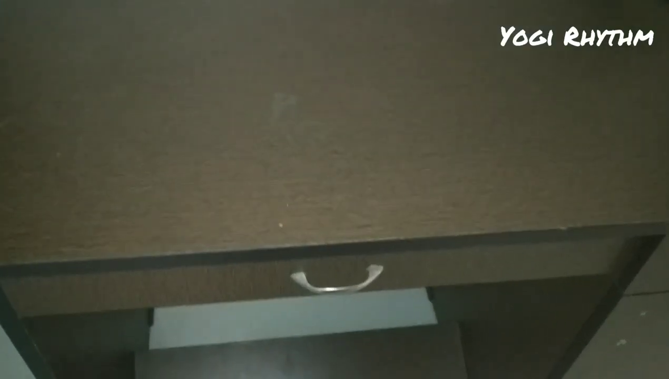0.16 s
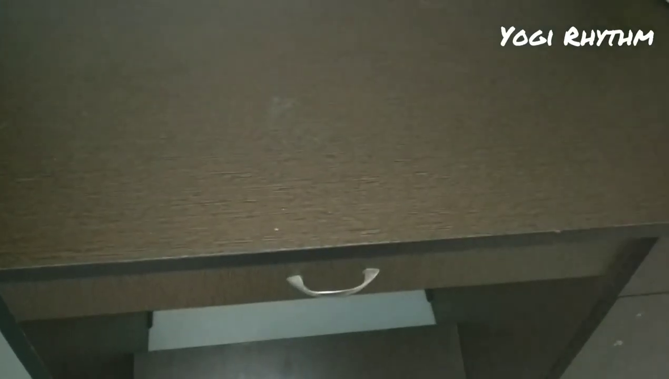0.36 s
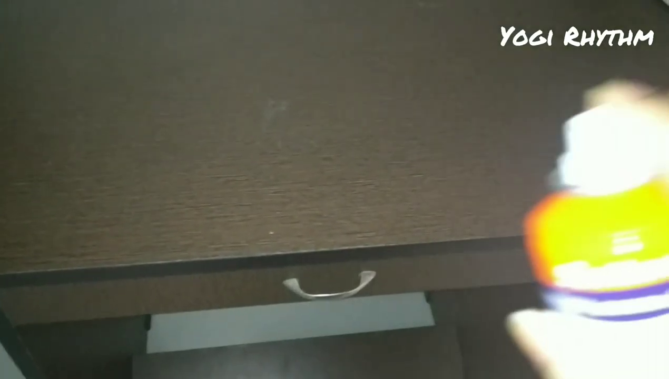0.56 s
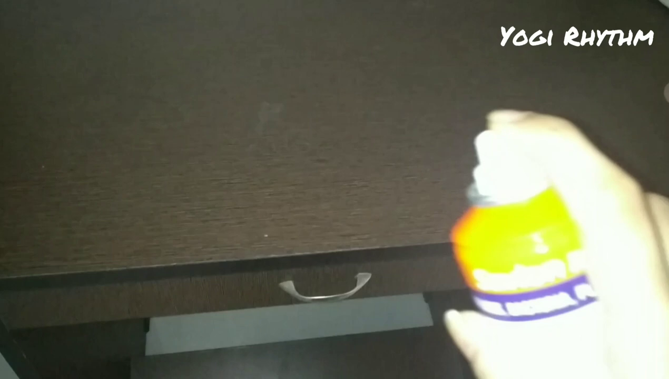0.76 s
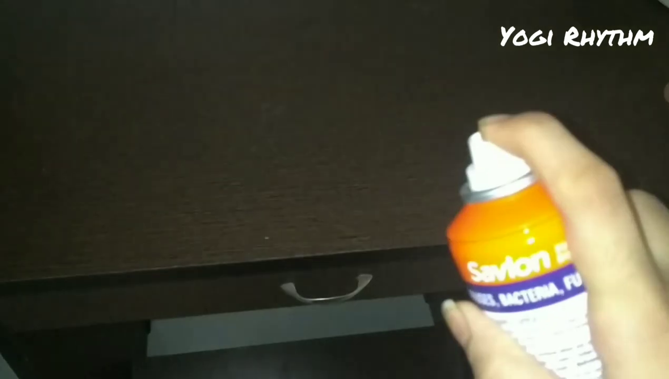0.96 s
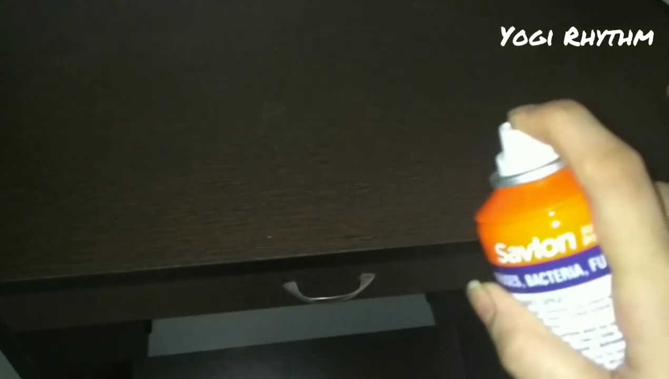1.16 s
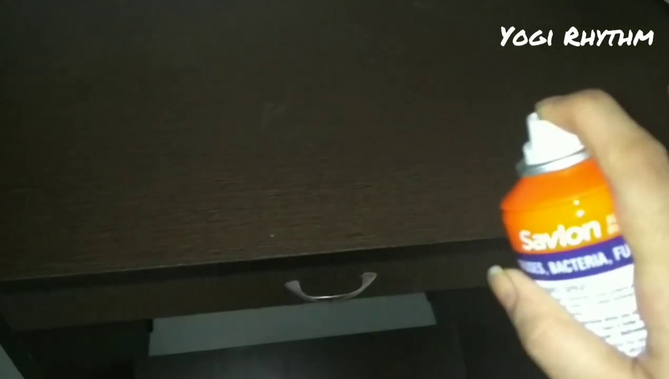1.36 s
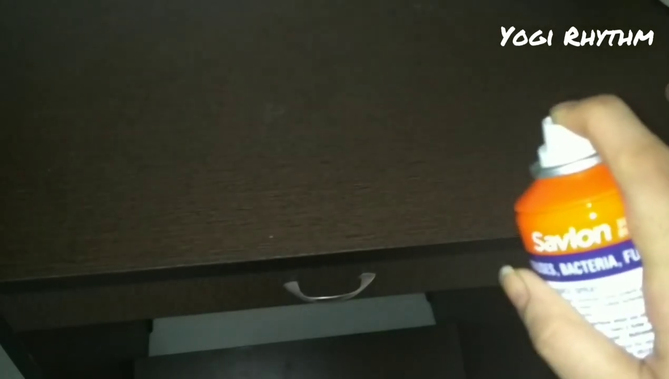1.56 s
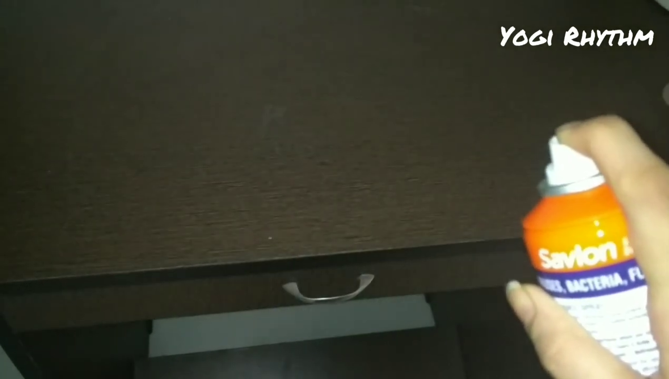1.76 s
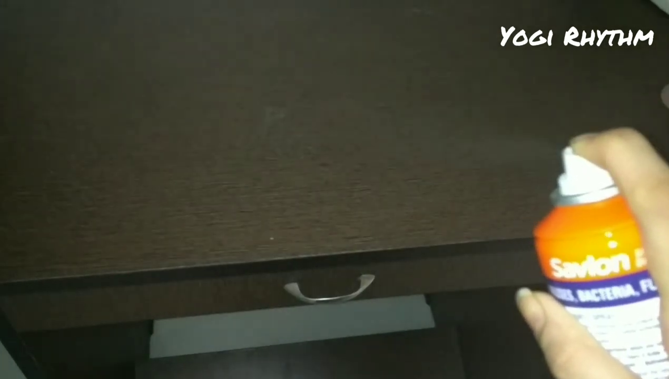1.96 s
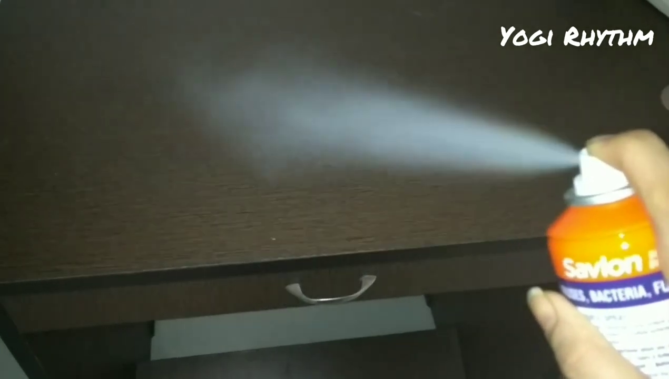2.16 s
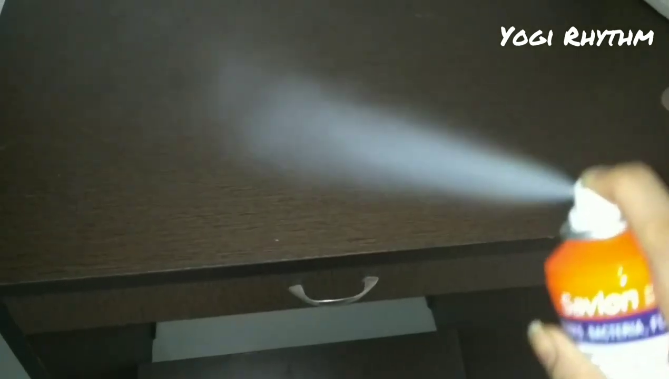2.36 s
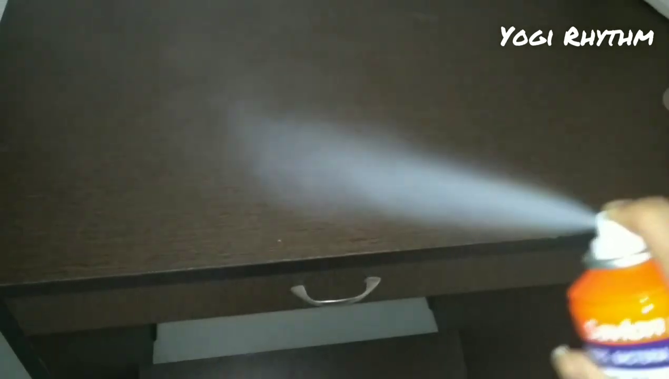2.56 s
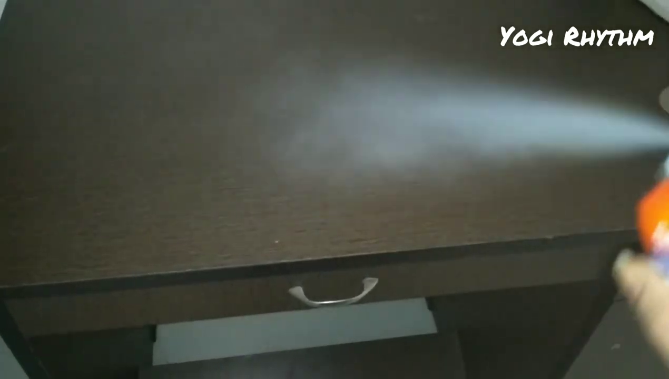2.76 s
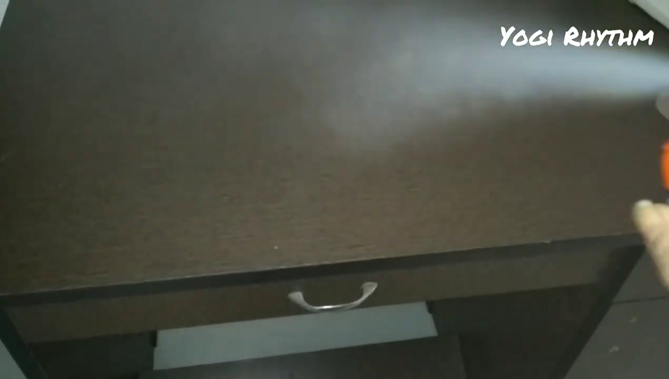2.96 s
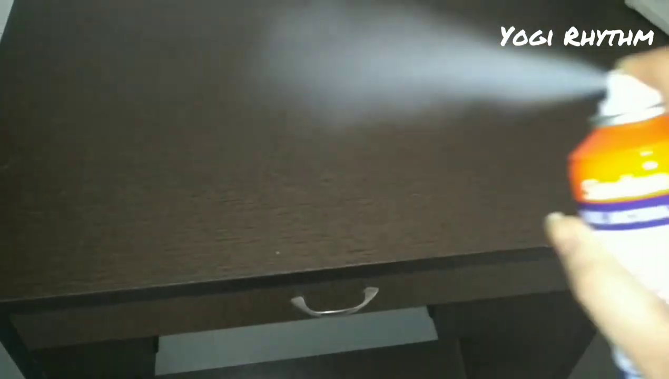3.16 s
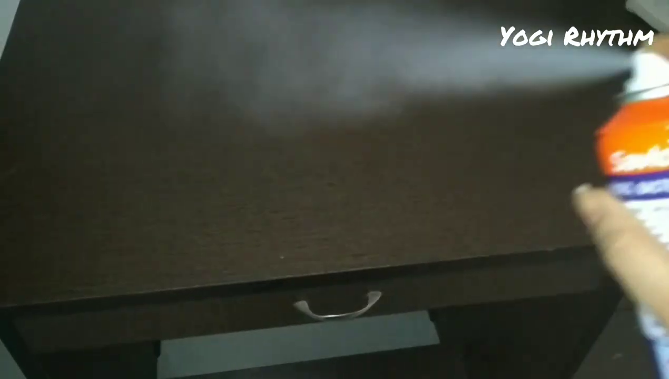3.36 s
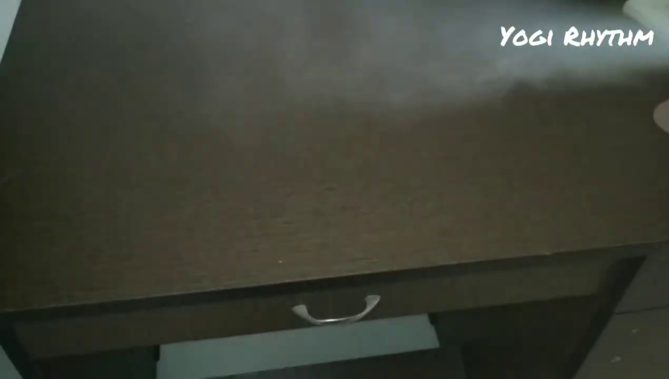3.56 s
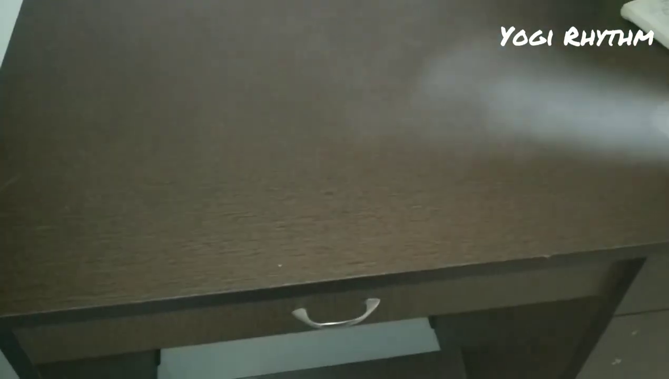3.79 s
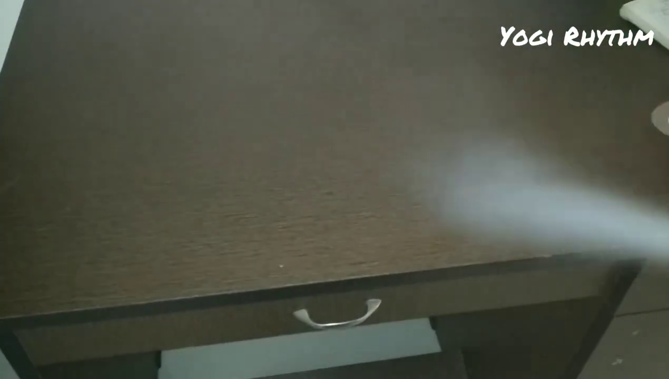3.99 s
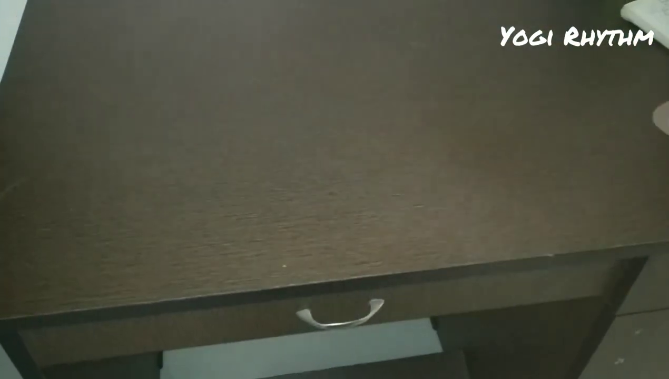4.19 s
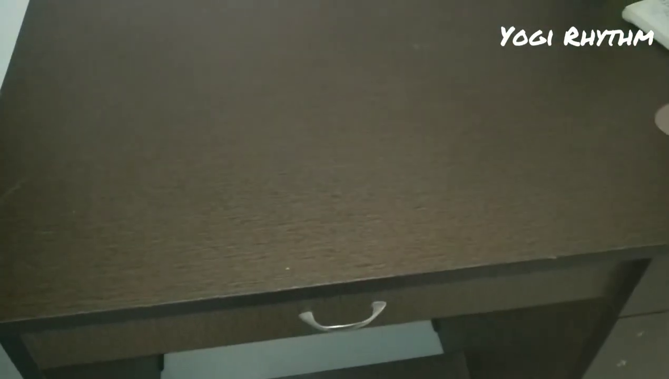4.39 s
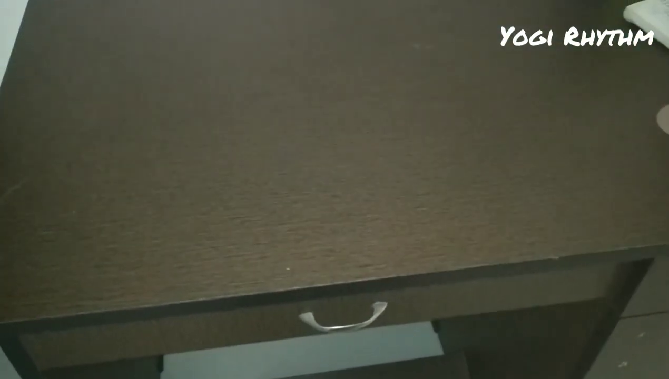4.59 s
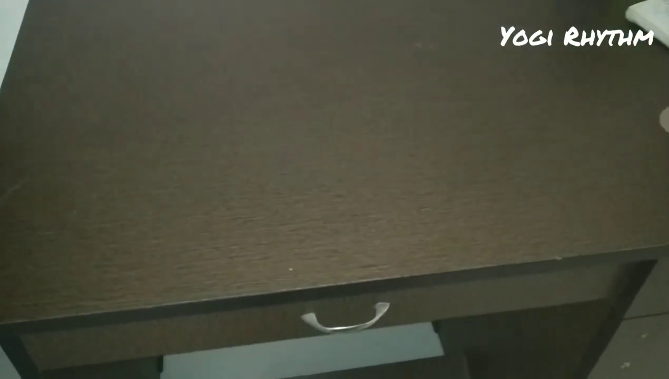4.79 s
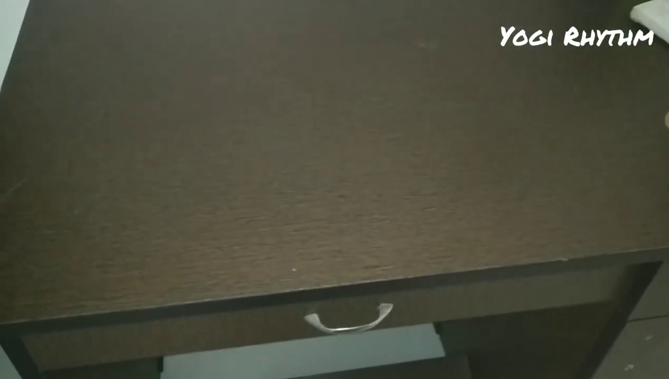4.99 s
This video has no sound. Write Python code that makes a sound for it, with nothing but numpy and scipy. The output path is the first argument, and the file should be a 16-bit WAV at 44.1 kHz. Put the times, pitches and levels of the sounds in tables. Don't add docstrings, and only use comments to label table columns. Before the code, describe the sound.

Soft rustle and tiny plastic clicks, then a sharp pressurised hiss of aerosol mist that stops abruptly, leaving a short ring and low room murmur.

```python
import sys
import numpy as np
from scipy import signal
from scipy.fft import rfft, irfft, next_fast_len
from scipy.io import wavfile
from scipy.ndimage import uniform_filter1d, map_coordinates

SR = 44100
rng = np.random.default_rng(int(sys.argv[2]) if len(sys.argv) > 2 else 0)


def master_out(mix):
    frames = np.transpose(np.atleast_2d(mix))
    ceiling = np.clip(frames, -1, 1)
    pcm = np.round(ceiling * 32767).astype(np.int16)
    wavfile.write(sys.argv[1], SR, pcm)


def gain_from_db(level_db):
    decades = np.asarray(level_db, float) / 20
    return 10 ** decades


N = 222131
TIME_S = np.arange(N) / SR

# start_s, hiss_db
FLOW = [
    (1.74, -46),
    (1.79, -40),
    (1.83, -43),
    (1.89, -26),
    (1.925, -19.5),
    (2.95, -22.5),
    (2.99, -19.5),
    (3.34, -21.5),
    (3.865, -21.5),
]
FULL_DB = -20


def unit(x):
    return x / np.sqrt(np.mean(x ** 2) + 1e-20)


def along(points, hz):
    f, v = np.transpose(points)
    return np.interp(np.log(hz + 1), np.log(f + 1), v)


def curves(rows, times=TIME_S):
    s, *columns = np.transpose(rows)
    return [np.interp(times, s, column) for column in columns]


def wobble(rate):
    knots = rng.standard_normal(int(N * rate / SR) + 4)
    return map_coordinates(knots, [np.arange(N) * rate / SR])


def swell(start, end, edge):
    return (np.tanh((TIME_S - start) / edge) - np.tanh((TIME_S - end) / edge)) / 2


def filtered(x, response):
    size = next_fast_len(N + SR // 2)
    return irfft(rfft(x, size) * response(np.fft.rfftfreq(size, 1 / SR)), size)[..., :N]


def rush(spectrum, patchy_db, channels=1):
    z = signal.stft(rng.standard_normal((channels, N)), nperseg=512)[2]
    patches = uniform_filter1d(rng.standard_normal(z.shape[1:]), size=6, axis=0)
    patches = uniform_filter1d(patches, size=10, axis=1)
    x = signal.istft(z * gain_from_db(patchy_db * unit(patches)), nperseg=512)[1][:, :N]
    return unit(filtered(x, lambda hz: gain_from_db(along(spectrum, hz))))


def diffuse(pair):
    # pitch_hz, likeness (1 = the same)
    likeness = [(60, 0.93), (130, 0.95), (290, 0.9), (640, 0.39), (1410, -0.23), (3100, -0.024),
                (6820, 0.15), (15000, 0.033)]

    def mix(hz):
        turn = np.arccos(np.clip(along(likeness, hz), -1, 1)) / 2
        return np.array([np.cos(turn), np.sin(turn)])

    mid, side = filtered(pair, mix)
    return np.array([mid + side, mid - side])


def spray():
    # start_s, left_lag_samples, left_port_ring_db, aim_db_per_octave, direct_db
    sweep = [(1.74, -2.5, 10, 1.4, -3), (2.3, -4.5, 3.5, .6, -4.5), (2.45, -5, 6.5, 1.8, -1),
             (2.6, -5.5, 4.5, 1, -1.5), (2.78, -7.5, -0.5, 0.4, -2), (3.1, -2.5, 3.5, 0.4, -2),
             (3.4, -8, .6, -0.2, -4.5), (3.65, -10, 3.5, 0, -3), (3.88, -9, 3, 0.5, -1.5)]
    # pitch_hz, level_db
    nearness = [(500, 8), (2000, 3), (4000, -1.5), (6000, 0.5), (10000, 2), (15000, -3.5)]
    dulls = 0.33
    hz, frames, z = signal.stft(jet(), SR, nperseg=512)
    hz = hz[:, None]
    lag, port_db, aim, near_db = curves(sweep, frames)
    hiss_db = curves(FLOW, frames)[0]
    bright = aim + dulls * np.minimum(hiss_db - FULL_DB, 0)
    z = z * gain_from_db(bright * np.log2((hz + 100) / 10000).clip(-1, 1))

    half_lag = np.exp(-1j * np.pi * hz * lag / SR)
    closeness_db = along(nearness, hz.ravel())[:, None]
    direct = gain_from_db(near_db + closeness_db) * np.array([z * half_lag, z / half_lag])
    into_room = signal.istft(z * gain_from_db(-closeness_db), SR, nperseg=512)[1][:N]
    both = direct + gain_from_db(2.0) * signal.stft(room(into_room), SR, nperseg=512)[2]
    both = shared_hollows(both, hz, frames)
    ring = gain_from_db(port_db / 2 * np.exp(-((hz - 9400) / 2000) ** 2))
    return signal.istft(both * [ring, 1 / ring], SR, nperseg=512)[1][:, :N]


def jet():
    # pitch_hz, level_db
    hiss_colour = [(1760, -31), (3000, -24), (3790, -25), (4570, -17.5), (5140, -18.5), (5470, -15),
                   (6500, -12.5), (9240, -0.5), (10800, -1), (12400, -6.5), (14900, -10.5), (15600, -10)]
    # pitch_hz, level_db
    mist_colour = [(290, -50), (500, -5), (896, -11.5), (1060, -6.5), (2750, -1), (3050, -7.5),
                   (4000, -9.5), (5200, -22.5), (8800, -120)]
    mist_full_db, mist_grows = -45, 1.4
    thins_db, thins_s = 2.4, 3.29
    hiss_db, = curves(FLOW)
    mist_db = mist_full_db + mist_grows * (hiss_db - FULL_DB) - thins_db * swell(thins_s, 9, 0.12)
    open_s, shut_s = FLOW[0][0], FLOW[-1][0]
    opening = np.clip((TIME_S - open_s) / 0.025, 0, 1)
    closing = np.clip((shut_s - TIME_S) / 0.012 + 1, 0, 1)
    sputter_db = 0.7 * wobble(39.96) + 1.9 * wobble(250)
    hiss = gain_from_db(hiss_db + sputter_db) * rush(hiss_colour, patchy_db=1)[0]
    mist = gain_from_db(mist_db + 1.87 * wobble(16)) * rush(mist_colour, patchy_db=2.0)[0]
    return (hiss + mist) * opening * closing


def shared_hollows(both, hz, frames):
    # middle_s, half_length_s, pitch_hz, depth_db
    hollows = [(1.845, 0.027, 5600, -6), (2.05, 0.18, 3660, -3), (2.226, 0.037, 6300, -6),
               (2.453, 0.026, 4940, -1), (2.52, 0.055, 3130, -4), (2.656, .05, 3800, -26),
               (2.86, 0.13, 3600, -22), (3.257, 0.19, 3650, -6), (3.558, .07, 1810, -6),
               (3.7, .06, 3170, -5), (3.931, 0.061, 3300, -3)]
    width = 0.12
    dip_db = 0
    for s, reach, middle_hz, db in hollows:
        dip_db = dip_db + db * np.exp(-((frames - s) / reach) ** 4 - ((hz / middle_hz - 1) / width) ** 4)
    return both + (gain_from_db(dip_db) - 1) * both.mean(axis=0)


def room(x, count=16):
    # pitch_hz, ring_s
    ring_out = [(500, 0.88), (2000, 0.42), (6000, 0.38), (10000, 0.43), (15000, 0.3)]
    out, place = np.zeros((2, N)), np.arange(N) / N * count
    for k in range(count + 1):
        hz, t, z = signal.stft(rng.standard_normal((2, SR // 2)), SR, nperseg=256)
        fading = gain_from_db(-60 * t / along(ring_out, hz)[:, None])
        tail = signal.istft(z * fading, SR, nperseg=256)[1]
        tail = tail / np.linalg.norm(tail[0])
        share = np.cos(np.pi / 2 * np.clip(place - k, -1, 1))
        out += signal.oaconvolve((share * x)[None], tail, axes=1)[:, :N]
    late = np.pad(out, ((0, 0), (200, 0)))[:, :N]
    return diffuse(late)


def seep():
    breath = filtered(rng.standard_normal((2, N)), lambda hz: 1 / (1 + ((hz - 6600) / 250) ** 2))
    return gain_from_db(-65) * swell(1.41, 1.75, 0.058) * unit(breath)


def ticks():
    # start_s, peak_db, left_over_right_db
    clicks = [(.0194, -34, 6), (.197, -42, 5), (.2494, -49, 5), (.4604, -47, 4), (0.589, -56, 0),
              (0.7992, -58, -5), (4.575, -54, 1), (4.5763, -42, 7), (4.5933, -42, 4), (4.664, -53, 3),
              (4.6654, -39, 9), (4.6698, -49, 2)]
    out, t = np.zeros((2, N + 440)), np.arange(400) / SR
    fading = gain_from_db(-60 * t / 0.0072) + 0.21 * gain_from_db(-60 * t / 0.033)
    for s, db, pan_db in clicks:
        burst = rng.standard_normal((2, 400)) * fading
        start = round(s * SR) + 40
        out[:, start:start + 400] += gain_from_db(db + 5 + pan_db * np.array([[.5], [-.5]])) * burst
    return filtered(out[:, :N], lambda hz: 1 / (1 + (8000 / (hz + 1)) ** 6))


def sleeve():
    # pitch_hz, level_db
    cloth_colour = [(880, -50), (1500, -18.5), (3480, -15), (4450, -17), (4720, -18), (5410, -17.5),
                    (8750, -6.5), (11600, -13), (15600, -29)]
    # peak_s, peak_db, rise_db_per_s, fall_db_per_s
    brushes = [
        (.04, -42.5, 100, 139),
        (.2, -54, 60, 32),
        (.91, -51, 97, 47),
        (1.74, -58, 47, 60),
        (4.1, -52, 55, 92),
        (4.68, -60.5, 141, 42),
    ]
    strokes = 0
    for s, db, rise, fall in brushes:
        strokes = strokes + gain_from_db(db + np.minimum(rise * (TIME_S - s), fall * (s - TIME_S)))
    return strokes * gain_from_db(1.3 * wobble(44)) * rush(cloth_colour, patchy_db=0.8, channels=2)


def fan():
    # pitch_hz, level_db, width_hz
    tones = [
        (131, -67, 11),
        (234, -61, 4.3),
        (350.8, -57, 2.3),
        (853, -64, 7.7),
    ]
    hum = 0
    for hz, db, width in tones:
        band = filtered(rng.standard_normal(N), lambda f: 1 / (1 + ((f - hz) / width) ** 2))
        hum = hum + gain_from_db(db) * unit(band)
    return hum * gain_from_db([[.5], [-.5]])


def drone():
    # start_s, pitch_hz, level_db
    engine = [(0.0, 33.5, -58), (0.15, 34.4, -50), (0.46, 37.04, -56), (0.77, 37.1, -48), (1.22, 36.9, -62),
              (1.33, 41.7, -57), (1.8, 45.9, -62), (1.88, 46.4, -50), (2.05, 49.2, -54), (2.33, 43.1, -51),
              (2.41, 41.06, -53.5), (3.2, 43.15, -44.5), (3.39, 44.66, -51), (3.91, 45.5, -43.5),
              (4.21, 47.1, -53.5), (5.04, 49.2, -47)]
    hz, level_db = curves(engine)
    turn = 2 * np.pi * np.cumsum(hz + 3 * wobble(40)) / SR
    note = np.sin(turn) + 0.16 * np.sin(2 * turn) + 0.13 * np.sin(3 * turn)
    return np.sqrt(2) * gain_from_db(level_db + 1.0 * wobble(25)) * note * gain_from_db([[.2], [-.2]])


def room_tone():
    # pitch_hz, level_db
    air_colour = [(12, -35), (25, -2.5), (50, -8.5), (90, -14.5), (240, -7.5), (350, -6), (520, -11),
                  (800, -16), (1300, -16.5), (2500, -24.5), (4500, -29), (6500, -31), (9500, -27.5),
                  (15600, -45)]
    still_db, draught_db, settle_s = -50.5, 1.5, 0.3
    level_db = still_db + draught_db * swell(1.9, 4.46, settle_s)
    return gain_from_db(level_db + 1.5 + 0.54 * wobble(4.935)) * diffuse(rush(air_colour, patchy_db=1, channels=2))


def scene():
    return spray() + seep() + ticks() + sleeve() + fan() + drone() + room_tone()


def band_limit(x):
    return signal.sosfilt(signal.butter(12, 15700, fs=SR, output="sos"), x)


def record(dry):
    mix = filtered(dry, lambda hz: hz < 15650)
    return band_limit(mix)


dry = scene()
out = record(dry)
master_out(out)
```